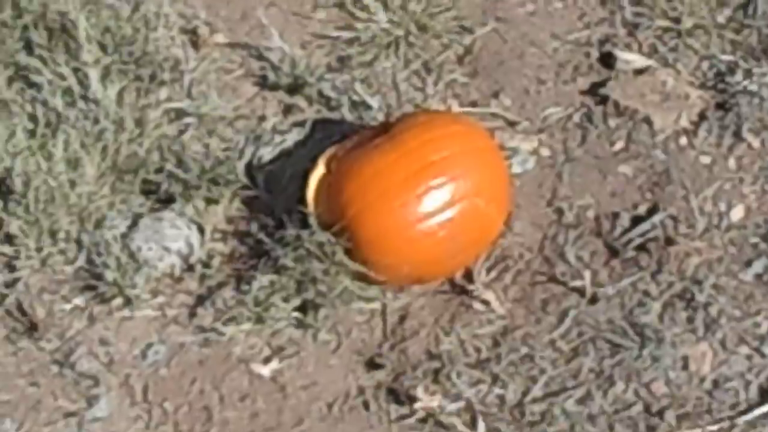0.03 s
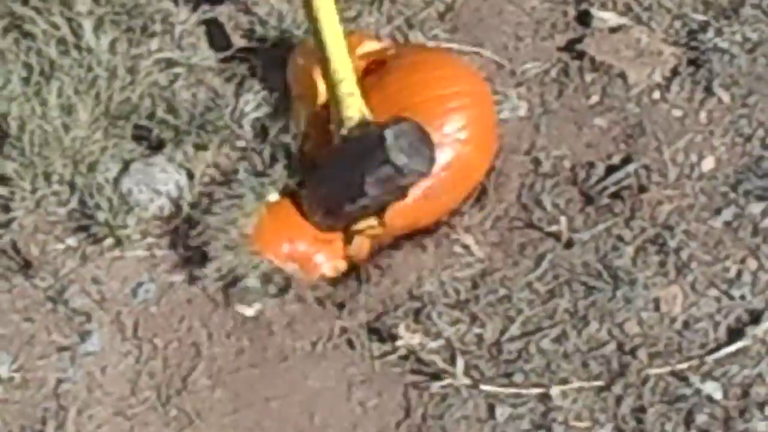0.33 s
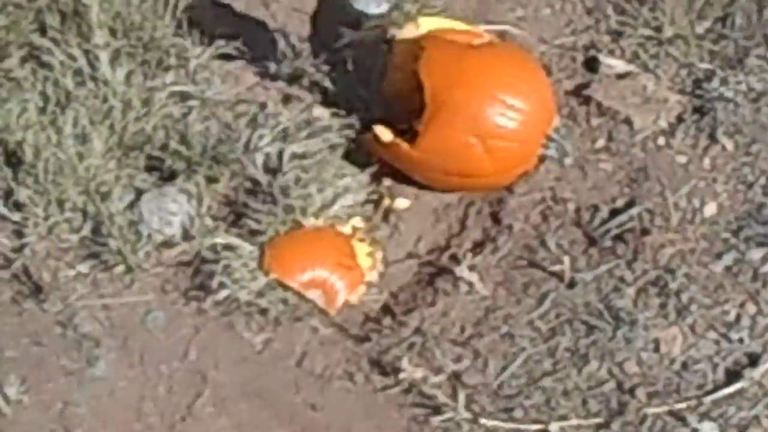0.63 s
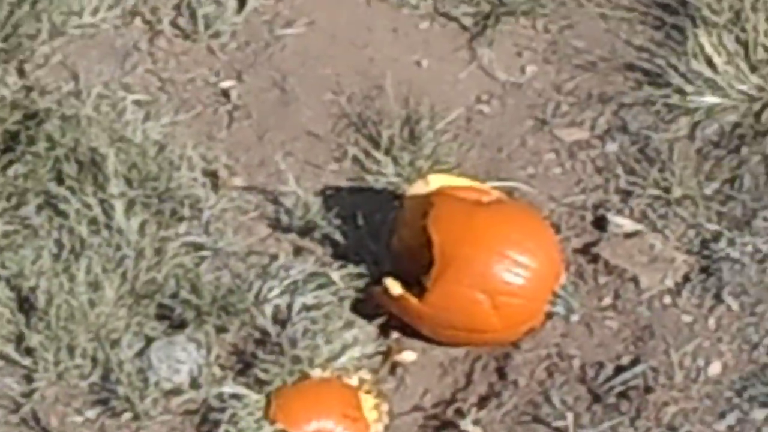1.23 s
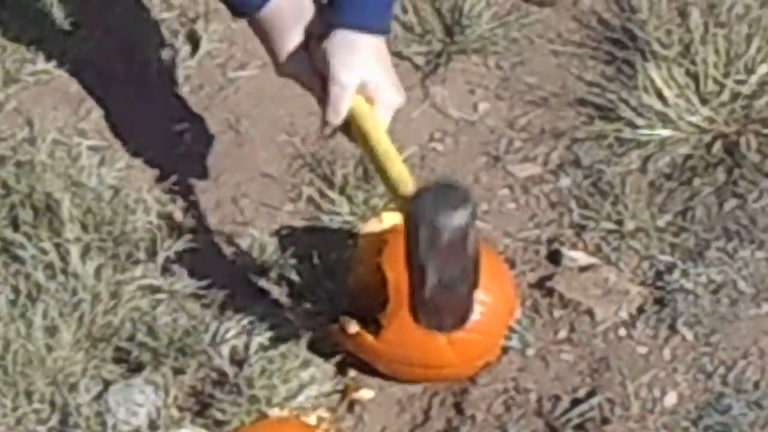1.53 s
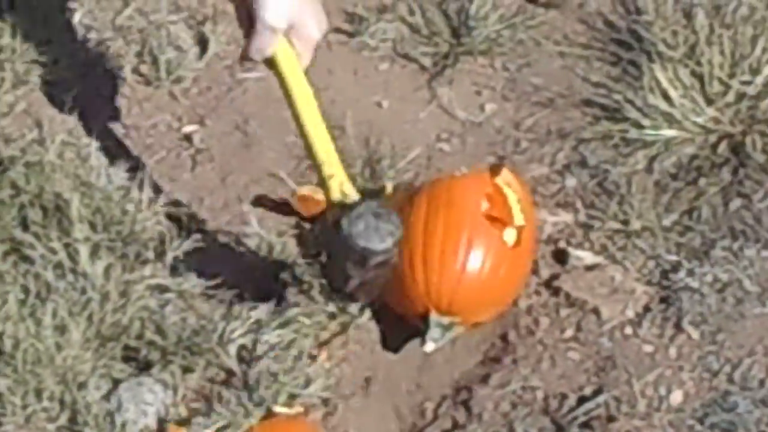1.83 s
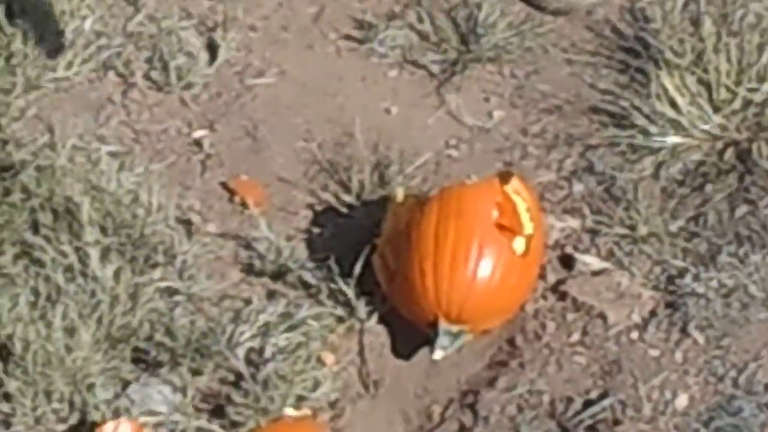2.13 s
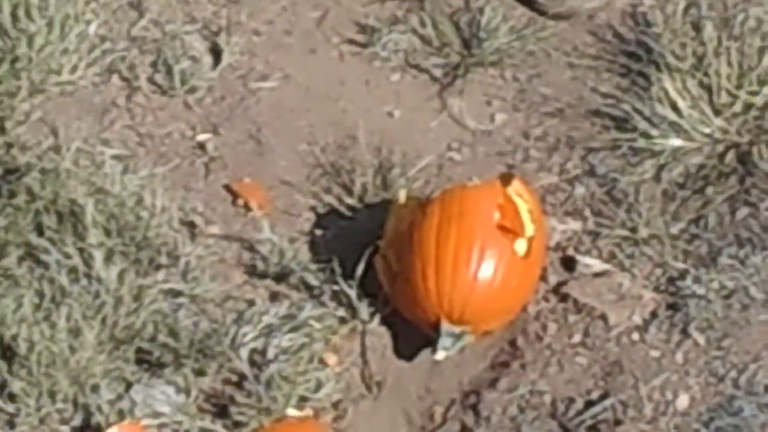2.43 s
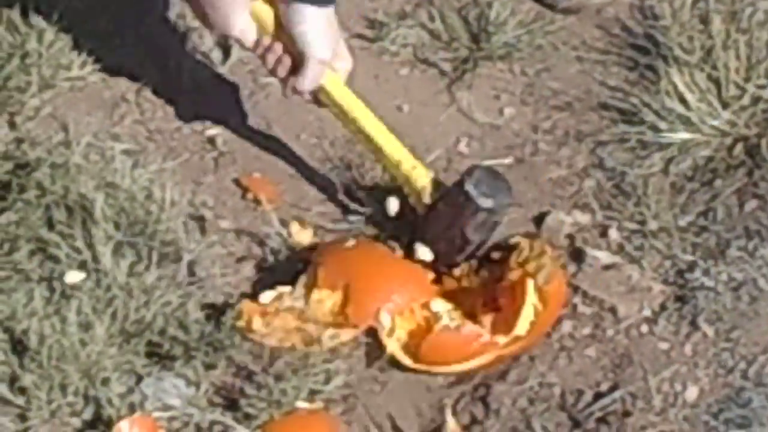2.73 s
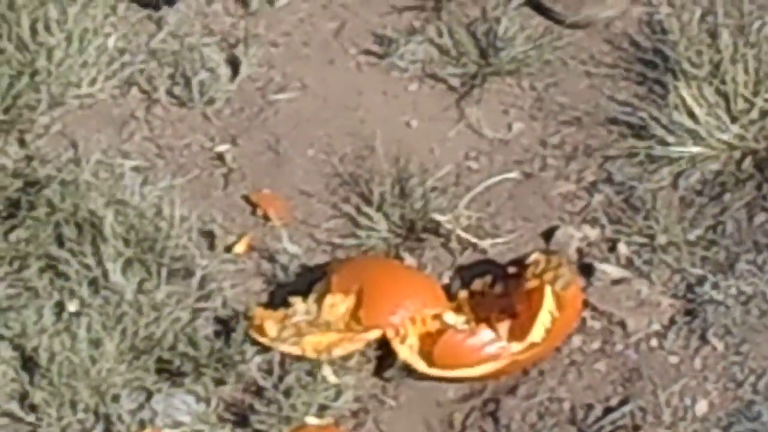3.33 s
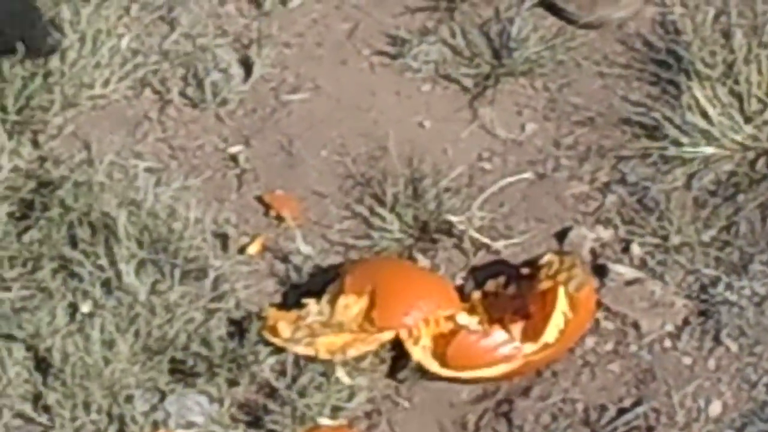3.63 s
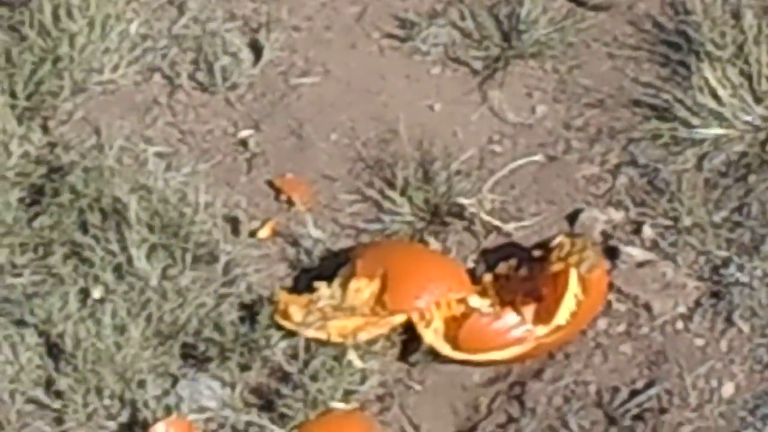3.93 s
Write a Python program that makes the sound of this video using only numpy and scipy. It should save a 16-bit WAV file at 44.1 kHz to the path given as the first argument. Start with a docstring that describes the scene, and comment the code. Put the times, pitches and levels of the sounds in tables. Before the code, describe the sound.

A sledgehammer smashes a pumpkin in three sharp, cracking smacks, with wind buffeting the microphone.

```python
"""Sledgehammer on a pumpkin

Three blows land on a pumpkin on dry ground outdoors. Each slaps the hollow shell, rips the rind in a
burst of cracks and thuds the flesh into the ground; pulp and bits patter into the grass.
Wind buffets the microphone more and more, and a far bird chirps twice over the hush of open land."""
import sys
import numpy as np
from scipy import signal
from scipy.fft import rfft, irfft
from scipy.io import wavfile
from scipy.ndimage import uniform_filter1d

SR = 44100
rng = np.random.default_rng(int(sys.argv[2]) if len(sys.argv) > 2 else 0)


def put_to_file(sound):
    """Save the sound as 16-bit audio at rate SR, in the file named by the first command-line argument."""
    columns = np.atleast_2d(sound).T  # one column per channel
    safe = np.clip(columns, -1, 1)
    whole_steps = np.round(safe * 32767)
    wavfile.write(sys.argv[1], SR, whole_steps.astype(np.int16))


N = 176400
T = np.arange(N) / SR

# hammer meets shell: (time [s], level [dB], settled pitch [Hz], ring t60 [s])
SLAPS = [(0.4085, -2.5, 353, 0.0044), (1.6532, -4, 447, 0.016), (2.6565, -3.5, 320, 0.0157)]
# single loud cracks of the rind: (time [s], level [dB], pitch [Hz])
CRACKS = [(0.4219, -23, 1500), (0.4291, -10, 8960), (0.4356, -18, 4000), (0.438, -29, 7000),
          (1.658, -6, 1630), (1.6615, -8, 6920), (1.6647, -8, 2980), (1.6679, -6, 4200),
          (1.6738, -17, 3970), (2.6683, -13, 1325), (2.669, -3.5, 3050), (2.6807, -20, 7500),
          (2.688, -17.5, 3000), (2.6987, -25, 7000)]
# colour of the dry hiss and the spray: (frequency [Hz], level per Hz [dB])
HISS_COLOUR = [(500, -8), (1500, 0), (1900, -1.5), (2400, -6), (5000, -6), (9500, -8.5), (11500, -22.5)]


def from_db(db):
    return 10 ** (np.asarray(db) / 20)


def rms_one(x):
    return x / np.sqrt(np.mean(x ** 2) + 1e-20)


def in_time(rows):
    """An automation curve: breakpoints joined by straight lines."""
    return np.interp(T, *np.transpose(rows))


def at_hz(rows, hz):
    """A spectrum, read on a log-frequency axis."""
    rows = np.array(rows)
    return np.interp(np.log(hz + 1e-9), np.log(rows[:, 0]), rows[:, 1])


def hump(hz, centre_hz):
    """An EQ bell about an octave wide on either side."""
    return np.exp(-np.log2(hz / centre_hz) ** 2)


def butter(x, hz, kind, order=2):
    sections = signal.butter(order, np.clip(hz, 10, .45 * SR), kind, fs=SR, output="sos")
    return signal.sosfilt(sections, x + 1e-18)


def colour(x, spectrum):
    """Noise shaped to a spectrum; rms 1."""
    hz = np.arange(N // 2 + 1) * SR / N
    return rms_one(irfft(rfft(x) * from_db(at_hz(spectrum, hz)), N))


def even(x, window_s=0.025):
    """Noise with its slow swell levelled out; rms 1."""
    power = uniform_filter1d(x ** 2, int(window_s * SR))
    return x / np.sqrt(np.maximum(power, 1e-12))


def drift(hz):
    """Random modulation below the given rate; rms 1."""
    return rms_one(butter(rng.standard_normal(N + SR), hz, "low")[SR:])


def burst(start, attack, hold, t60):
    """Envelope: straight rise, hold, exponential release; times in seconds."""
    age = T - start
    return np.clip(age / attack, 0, 1) * from_db(-60 * np.maximum(age - attack - hold, 0) / t60)


def ring(start, hz, t60, sag=0, settle_s=0.0013):
    """A struck mode; its pitch starts higher by the share `sag` and settles."""
    age = np.maximum(T - start, 0)
    cycles = hz * (age + sag * settle_s * (1 - np.exp(-age / settle_s)))
    return np.sin(2 * np.pi * cycles) * np.exp(-np.log(1000) * age / t60)


def grains(per_s=8000, spread_db=2):
    """Random clicks of uneven size."""
    clicks = (rng.random(N) < per_s / SR) * rng.choice([-1, 1], N)
    return clicks * from_db(spread_db * np.minimum(rng.exponential(1, N), 4))


def crackle(spectrum, per_s=8000, low_cut_hz=617):
    """Dense coloured clicks with the bass cut away; rms 1."""
    return rms_one(butter(colour(grains(per_s), spectrum), low_cut_hz, "high"))


def background():
    """The hush of open land, and a dry hiss that fades after the first blow."""
    # far outdoor hush: (frequency [Hz], level per Hz [dB])
    air_colour = [(60, -13.5), (110, -7), (200, -5), (650, -3.5), (1100, -9.5), (1700, -14.5), (2300, -19),
                  (4500, -22.5), (10000, -26), (11500, -42), (13000, -70)]
    # fade of the hiss: (time [s], level [dB])
    hiss_fade = [(0, -50), (.15, -52), (.2, -55), (.38, -57), (.5, -50), (.62, -56), (.72, -58), (.8, -65),
                 (1.1, -82), (1.26, -62), (1.5, -77.5), (4, -84)]
    air = from_db(-55) * colour(rng.standard_normal(N), air_colour)
    hiss = from_db(in_time(hiss_fade) + .7 * drift(30)) * colour(rng.standard_normal(N), HISS_COLOUR)
    return air + hiss


def bird():
    """A far bird: thin, rough chirps that sweep upward."""
    # chirps: (time [s], length [s], level [dB])
    chirps = [(3.633, .036, -59), (3.73, 0.059, -59.5)]
    start_hz, rise_hz, rough_hz = 6800, 1510, 551
    out, waver = 0, rough_hz * drift(600)
    for start, length, db in chirps:
        along = np.clip((T - start) / length, 0, 1)
        hz = start_hz + rise_hz * along ** 2 + waver
        out += from_db(db) * np.sin(np.pi * along) * np.sin(2 * np.pi * np.cumsum(hz) / SR)
    return out


def wind():
    """Wind on the microphone: a lumpy rumble that brightens as the gust grows."""
    # wind pressure: (time [s], level [dB])
    gusts = [(0.0, -60), (0.36, -56), (0.46, -41), (0.495, -25), (0.52, -43), (.56, -29.5), (0.66, -67),
             (0.73, -34.5), (0.79, -47.5), (1.28, -50.5), (1.49, -42.5), (1.61, -53.5), (1.7, -43.5),
             (1.76, -33), (1.85, -57), (1.91, -33.5), (2.0, -27), (2.09, -36), (2.19, -28), (2.35, -29),
             (2.45, -43.5), (2.58, -36), (2.61, -39.5), (2.85, -27), (2.88, -24.5), (2.92, -29.5),
             (2.97, -24.5), (3.13, -21.5), (3.17, -17.5), (3.25, -18), (3.32, -23), (3.46, -23.5),
             (3.56, -26.5), (3.76, -29), (3.87, -27.5), (3.92, -30.5), (3.97, -16.5), (4.0, -23.5)]
    # rumble in a strong gust: (frequency [Hz], band level [dB])
    rumble_colour = [(25, -28), (60, -27), (120, -28), (240, -35), (480, -47), (960, -73)]
    strong_gust_db, flicker_db, flutter_db = -20.5, 2, 2.5
    knee_hz, brighten_per_octave = 64.8, 0.66  # bands above the knee follow the gust more steeply
    gust_db = in_time(gusts) - strong_gust_db + flicker_db * drift(22)
    out, edges_hz = 0, 18 * 2 ** (np.arange(10) * 2 / 3)
    for low, high in zip(edges_hz, edges_hz[1:]):
        hz = np.sqrt(low * high)
        band = even(butter(rng.standard_normal(N + SR), [low, high], "band", order=3))[SR:]
        steepness = 1 + brighten_per_octave * max(np.log2(hz / knee_hz), 0)
        out += band * from_db(at_hz(rumble_colour, hz) + steepness * gust_db + flutter_db * drift(25))
    return out


def port(x, low_hz=66.1, high_hz=710, q=1.07):
    """The microphone port loses the lowest bass and resonates just below its upper edge."""
    w = 2 * np.pi * high_hz
    resonance = signal.bilinear([w * w], [1, w / q, w * w], SR)
    return signal.lfilter(*resonance, butter(x, low_hz, "high", order=1))


def eddies():
    """Eddies suck briefly at the port, each in a puff of turbulence, strongest for the tightest."""
    # eddies hitting the microphone: (time [s], level [dB], half width [ms])
    buffets = [(.486, -24.5, 1.2), (0.549, -17, 4.2), (.893, -27, 2.3), (2.037, -12.5, 3),
               (2.155, -11.5, 1.43), (2.19, -11.5, 2.5), (2.2439, -6, 1.95), (2.311, -13, 2.13),
               (2.35, -16.5, 3.1), (2.87, -11, 1.32), (2.964, -8, 3.3), (3.028, -10.5, 3),
               (3.087, -7.5, 1.4), (3.1667, -3.5, 0.54), (3.1764, -11.5, 1), (3.211, -6.5, 2.4),
               (3.234, -14, 0.46), (3.273, -4, 0.67), (3.449, -9.5, 1.24), (3.607, -9.5, 1.67),
               (3.845, -8, 1.62), (3.873, -12, 1.2), (3.9699, 1, 0.83)]
    lead_s, puff_band_hz = 0.0046, (400, 737)
    suction, puffs = 0, 0
    for at, db, width_ms in buffets:
        suction -= from_db(db) / (1 + ((T - at) * 1000 / width_ms) ** 2)
        puffs += from_db(db - 36) / width_ms ** 2 * burst(at - lead_s, lead_s, hold=0, t60=0.041)
    turbulence = even(butter(rng.standard_normal(N), puff_band_hz, "band", order=3))
    return port(suction) + puffs * turbulence


def debris():
    """Gritty scuffs and single pieces landing, and a bright tick as the hardest eddy slams the microphone."""
    # scuffs and landings, the last row a tick from the hardest eddy: (time [s], level [dB], pitch [Hz], half
    # width [octaves], t60 [s])
    patters = [(.11, -52.5, 1280, 1.8, 0.46), (.137, -40, 1000, 0.75, 0.081),
               (0.192, -49, 1100, 0.55, 0.12), (0.36, -48, 1820, .3, 0.02),
               (0.692, -40.5, 3500, 0.52, 0.034), (0.691, -45, 1670, 0.37, 0.08),
               (0.719, -49, 1600, 0.43, 0.087), (0.782, -43.5, 1470, 0.4, 0.0098),
               (1.261, -51.5, 2840, 0.63, 0.028), (2.59, -54, 1670, 0.18, 0.044),
               (2.76, -59, 3200, 0.79, 0.36), (3.892, -48.5, 1850, 0.13, 0.038),
               (3.97, -43.5, 2400, 1.0, 0.0062)]
    out, grit = 0, grains(per_s=12000, spread_db=1.2)
    for start, db, hz, octaves, t60 in patters:
        width = 2 ** octaves
        band = rms_one(butter(grit, [hz / width, hz * width], "band"))
        out += from_db(db) * burst(start, attack=0.0021, hold=0, t60=t60) * band
    return out


def ripping():
    """The skin is crushed, then tears in dense fractures; pulp squashes, grit and seeds spray out."""
    # rind rips open: (time [s], hold [s], level [dB], pulp [dB], tail [dB], tail hold [s],
    # tail t60 [s], spray [dB], spray t60 [s], mid boost [dB], treble boost [dB])
    rips = [(0.4109, 0.0021, -11.5, -17, -19.5, 0.0064, 0.066, -56, 0.81, -1.5, 3),
            (1.658, 0.0073, -14.5, -16.5, -21, 0.0068, 0.044, -44.5, 0.28, 2.5, -0.5),
            (2.6623, 0.0061, -11.5, -31, -24.5, 0.019, 0.066, -53, .7, -0.5, -1.5)]
    # colour of the breaking rind: (frequency [Hz], level per Hz [dB])
    rind_colour = [(400, -27), (680, -4), (830, -9.5), (1000, 2), (1700, -2), (2230, -10.5), (2900, -1.5),
                   (3600, -6.5), (4230, -6.5), (4650, -5.5), (5400, -7), (7400, -6), (8200, -13.5),
                   (9500, -5.5), (10400, -18), (12000, -31)]
    # colour of the squashed pulp: (frequency [Hz], level per Hz [dB])
    pulp_colour = [(100, -9.5), (250, -8), (450, 1), (800, -11), (1500, -14), (4000, -42.5)]
    attack_s, tear_t60_s, crack_t60_s = 0.00099, 0.0079, 0.0047
    crush_db, slap_grit_db, crack_grit_db = -26, -12.5, -8.5
    mid_hz, top_hz, wet_top_db = 2476, 9500, -5.5  # wet fibres tear last, with less treble
    squash = colour(grains(), pulp_colour)
    scatter = crackle(HISS_COLOUR, per_s=3400)
    out = 0
    for (contact, slap_db, _, _), rip in zip(SLAPS, rips):
        start, hold, tear_db, pulp_db, tail_db, tail_hold, tail_t60 = rip[:7]
        spray_db, spray_t60, mid_db, top_db = rip[7:]
        crisp = [(hz, db + mid_db * hump(hz, mid_hz) + top_db * hump(hz, top_hz))
                 for hz, db in rind_colour]
        wet = [(hz, db + wet_top_db * hump(hz, top_hz)) for hz, db in crisp]
        crush = from_db(crush_db) * burst(contact, attack_s, start - contact, crack_t60_s)
        tear = from_db(tear_db) * burst(start, attack_s, hold, tear_t60_s)
        # the slap and each loud crack of this blow get a spike of grit
        snaps = [(contact, slap_db + slap_grit_db)]
        snaps += [(at, db + crack_grit_db) for at, db, _ in CRACKS if abs(at - start) < .5]
        spikes = [from_db(db) * burst(at, .0001, 0.00042, crack_t60_s) for at, db in snaps]
        rind = np.sqrt(sum(stage ** 2 for stage in [crush, tear, *spikes])) * crackle(crisp)
        flesh = from_db(tail_db) * crackle(wet) + from_db(pulp_db) * squash
        tail = burst(start, attack_s, tail_hold, tail_t60) * flesh
        spray = from_db(spray_db) * burst(start, attack=.01, hold=0, t60=spray_t60) * scatter
        out += rind + tail + spray
    return out


def hammer_blows():
    """The shell slaps, sagging in pitch as it caves in; the hollow rings, rind cracks, flesh thuds."""
    # hammer head drives the flesh into the ground: (time [s], level [dB], pitch [Hz], t60 [s])
    ground_hits = [(0.4144, 0, 318, 0.029), (1.6645, -6, 448, 0.017), (2.6643, -15, 319, 0.03)]
    # hollow of the fruit, rung by every blow: (pitch [Hz], level [dB], t60 [s])
    hollow_modes = [(678, -20, 0.047), (1290, -35.5, 0.041)]
    crack_cycles, shell_low_hz = 14, 188  # the shell radiates little bass
    slaps = sum(from_db(db) * ring(at, hz, t60, sag=.65) for at, db, hz, t60 in SLAPS)
    thuds = sum(from_db(db) * ring(at, hz, t60) for at, db, hz, t60 in ground_hits)
    hollow = sum(from_db(db) * ring(at, hz, t60) for at, *_ in SLAPS for hz, db, t60 in hollow_modes)
    cracks = sum(from_db(db) * ring(at, hz, t60=crack_cycles / hz) for at, db, hz in CRACKS)
    return butter(slaps + thuds + hollow + cracks, shell_low_hz, "high", order=1)


def scene():
    """The mono mix of the smash, the wind and the open land."""
    return (hammer_blows() + ripping() + debris() + wind() + eddies() + bird() + background())[None]


def record(dry):
    """The smacks overload the microphone into soft clipping; the top is cut."""
    ceiling, treble_edge_hz, cutoff_hz = 0.8, 11020, 12500
    clipped = dry / (1 + (dry / ceiling) ** 4) ** .25
    dull = butter(clipped, treble_edge_hz, "low", order=10)
    return signal.sosfilt(signal.ellip(10, .1, 70, cutoff_hz, fs=SR, output="sos"), dull)


dry = scene()
out = record(dry)
put_to_file(out)
```